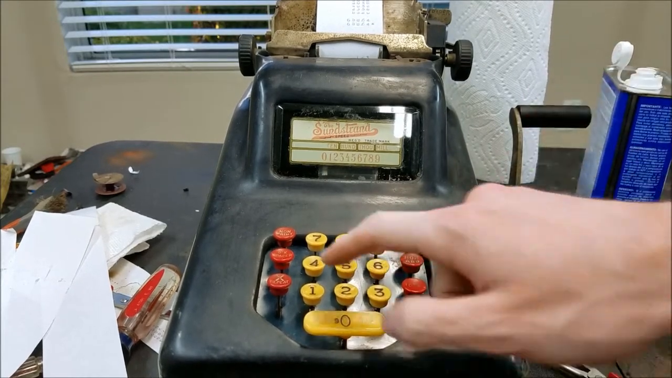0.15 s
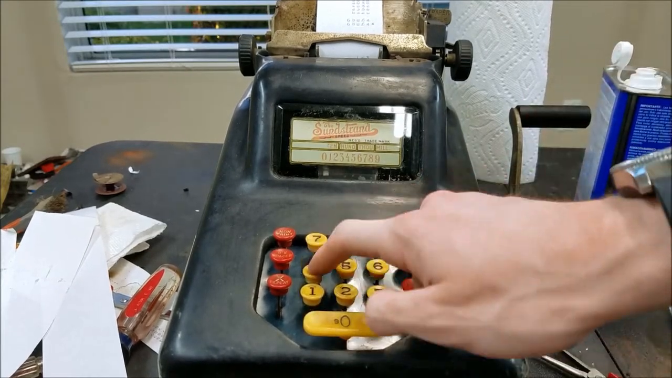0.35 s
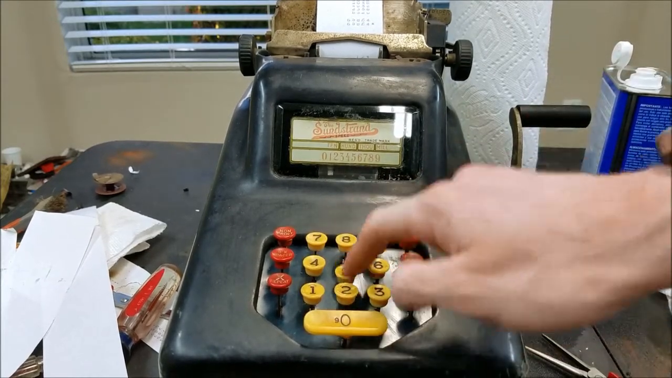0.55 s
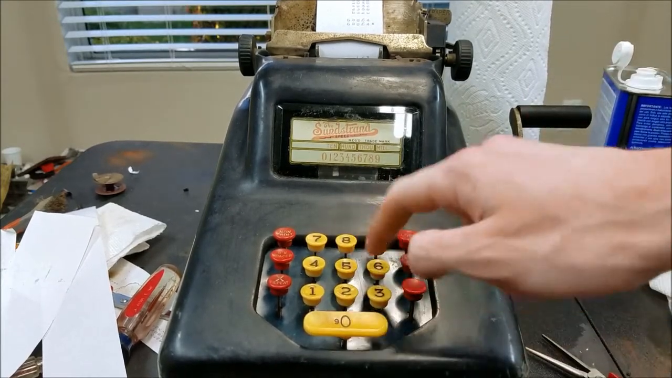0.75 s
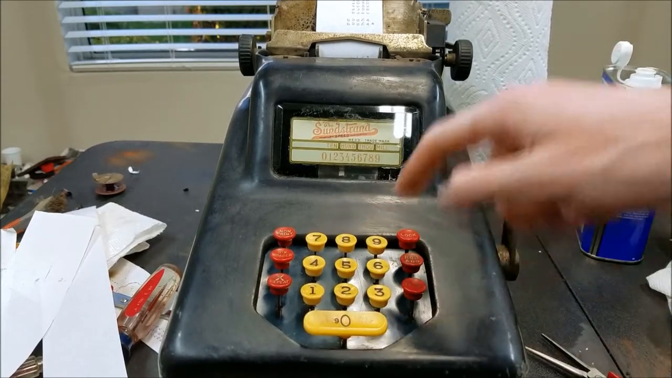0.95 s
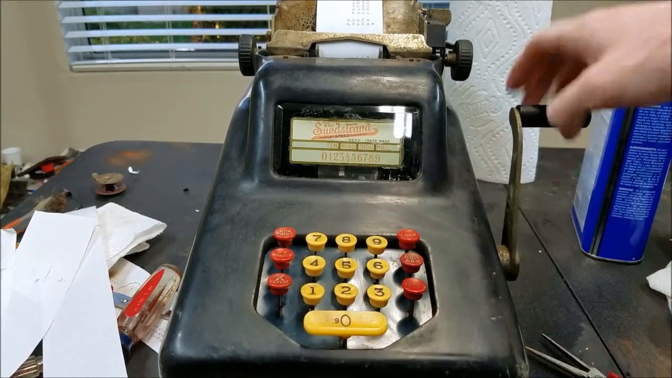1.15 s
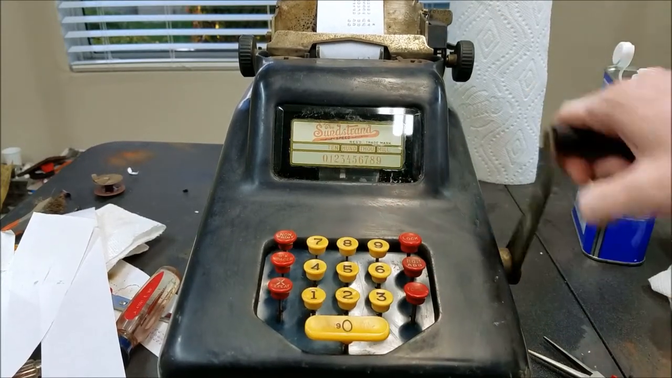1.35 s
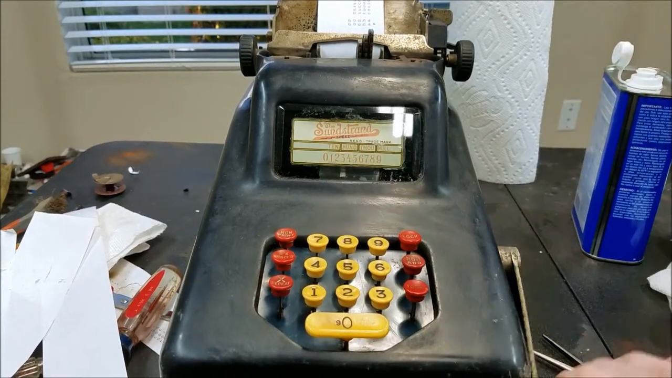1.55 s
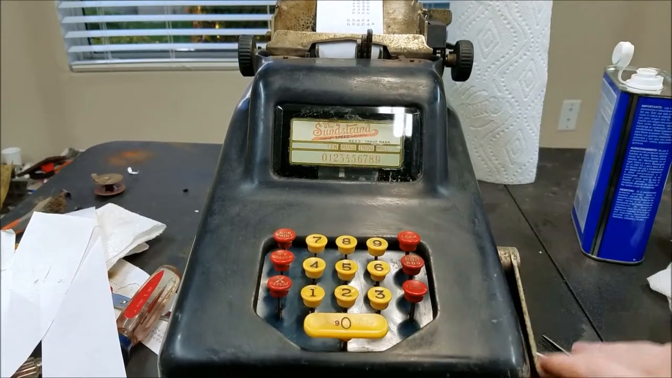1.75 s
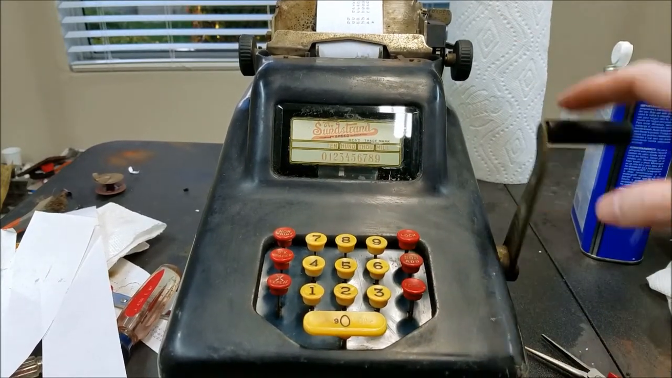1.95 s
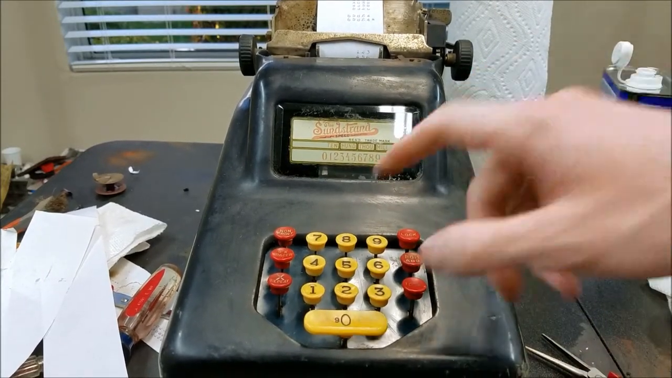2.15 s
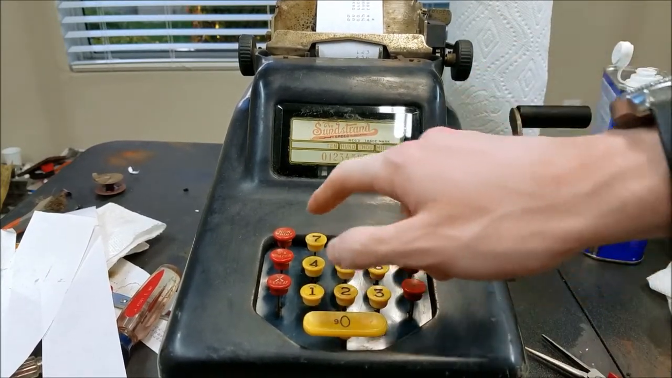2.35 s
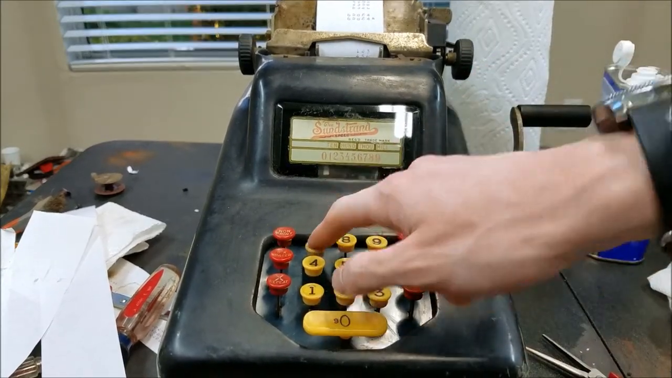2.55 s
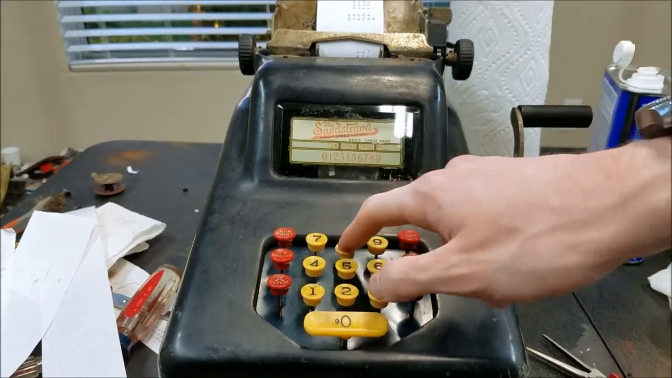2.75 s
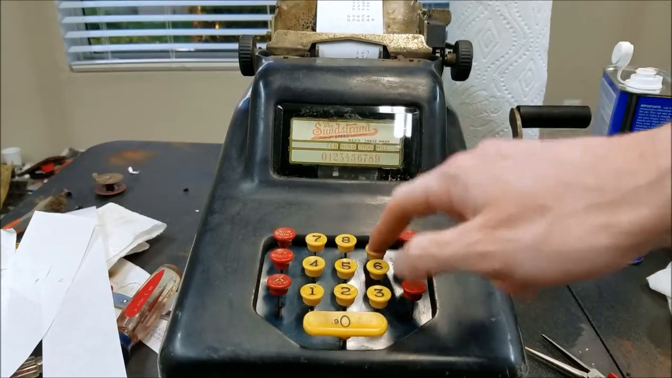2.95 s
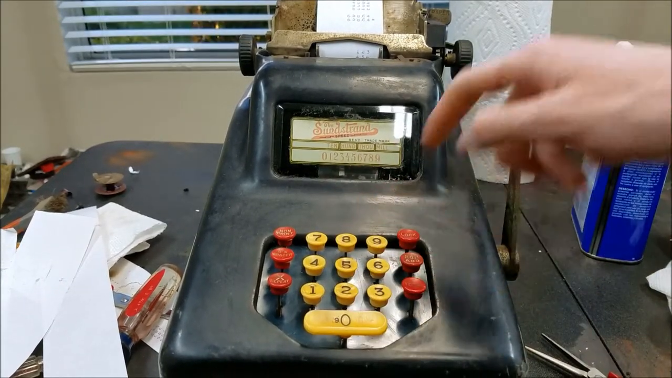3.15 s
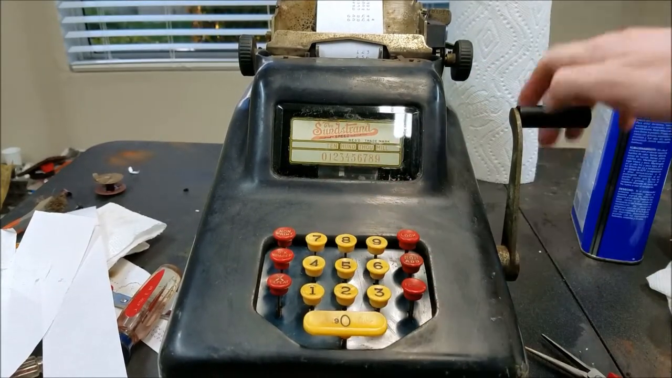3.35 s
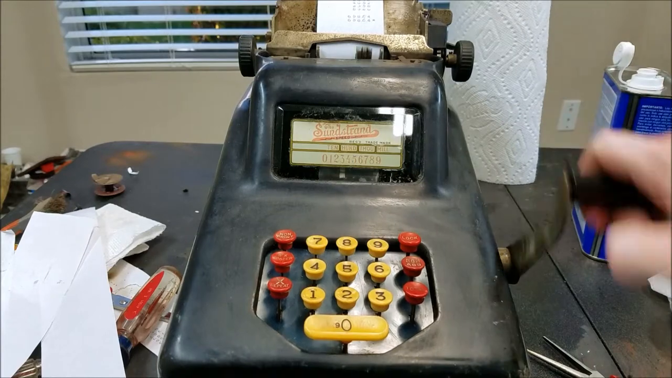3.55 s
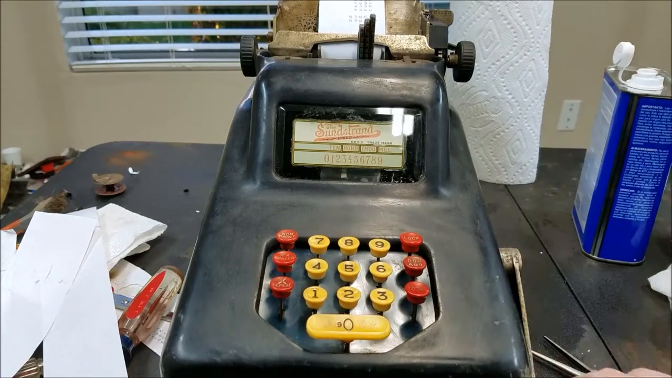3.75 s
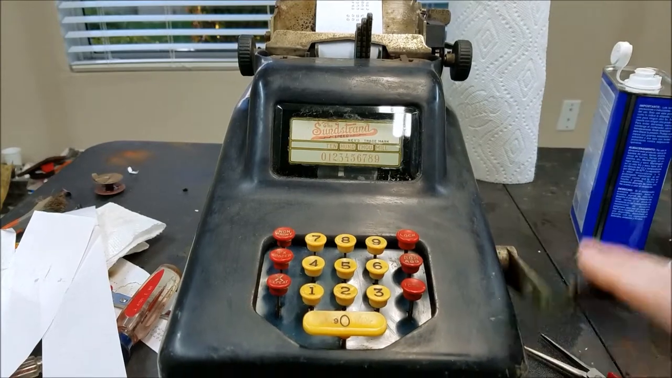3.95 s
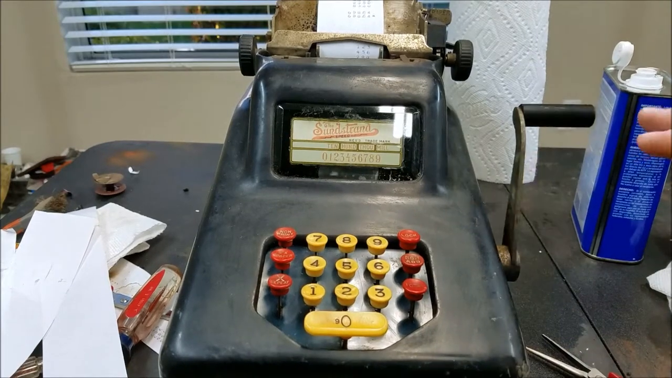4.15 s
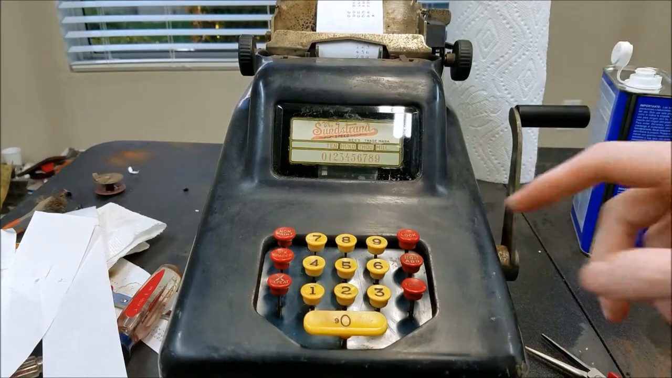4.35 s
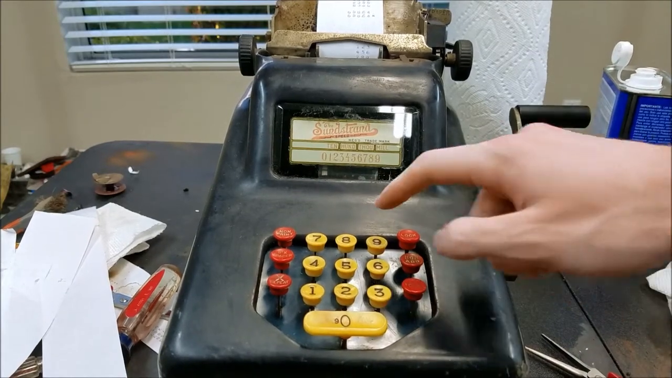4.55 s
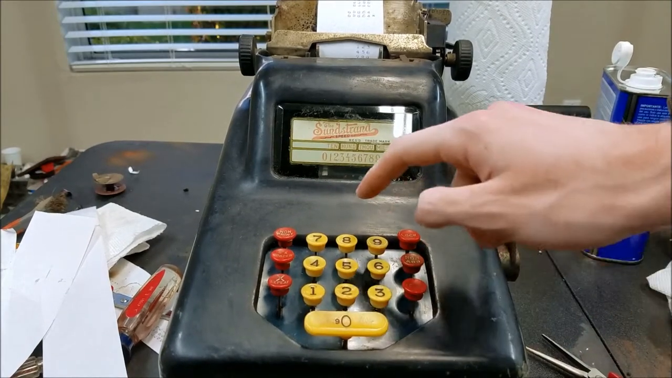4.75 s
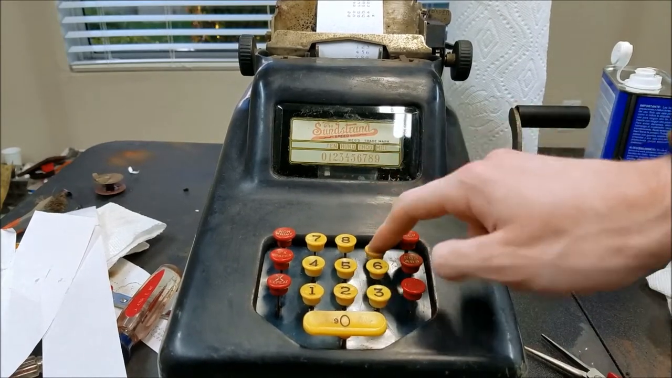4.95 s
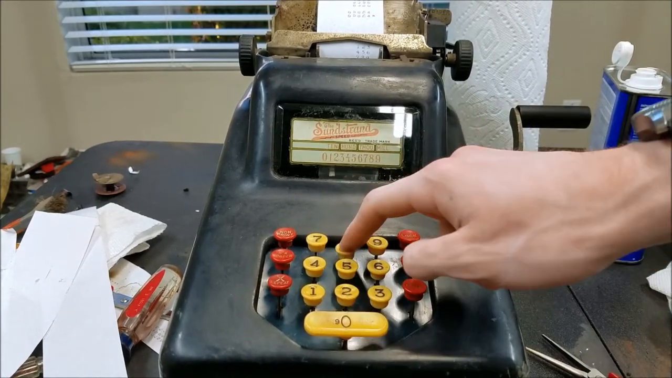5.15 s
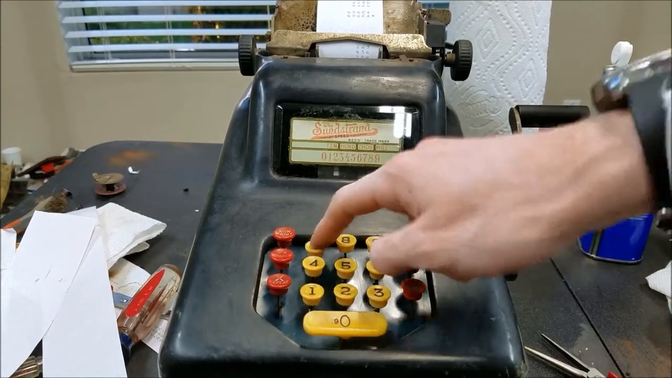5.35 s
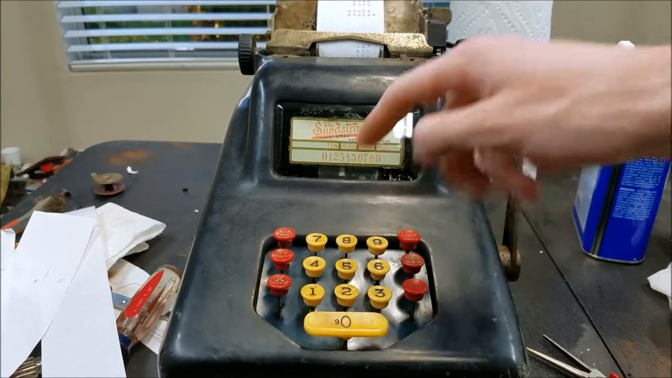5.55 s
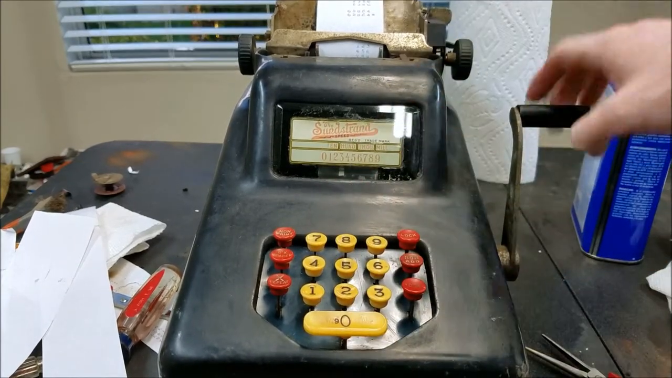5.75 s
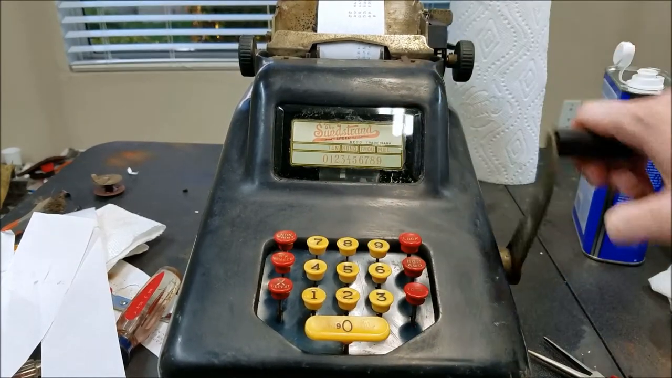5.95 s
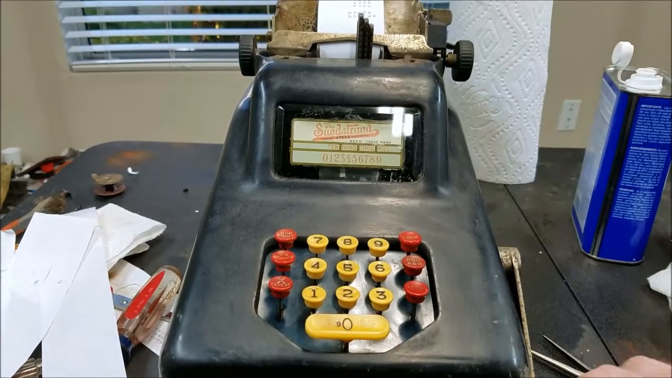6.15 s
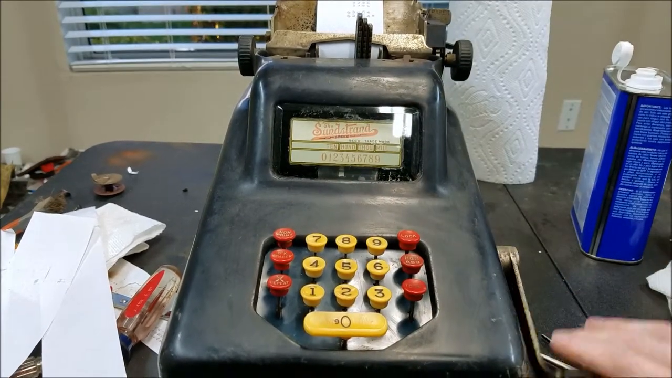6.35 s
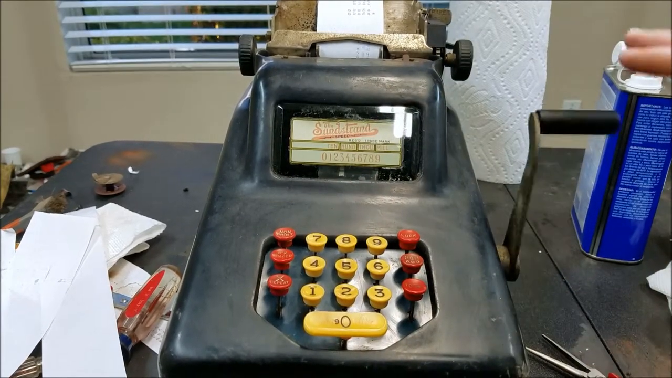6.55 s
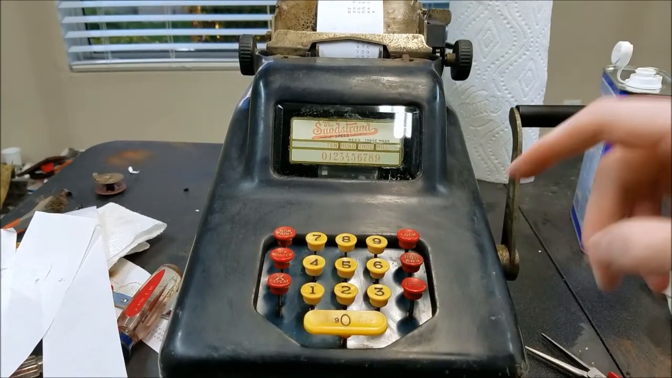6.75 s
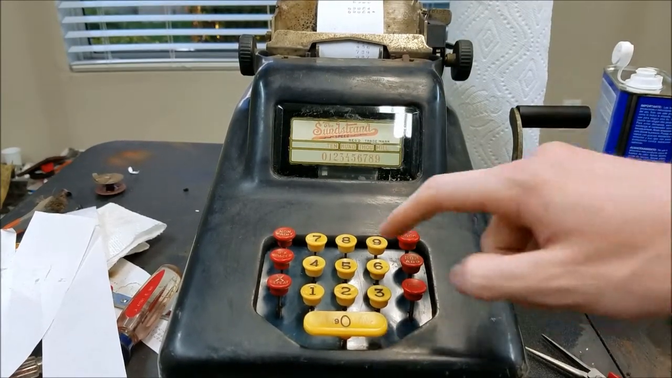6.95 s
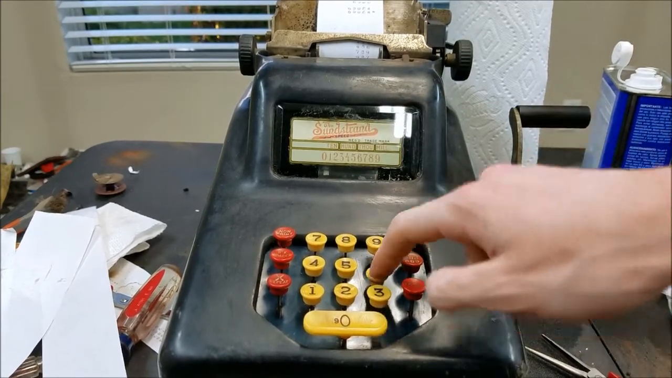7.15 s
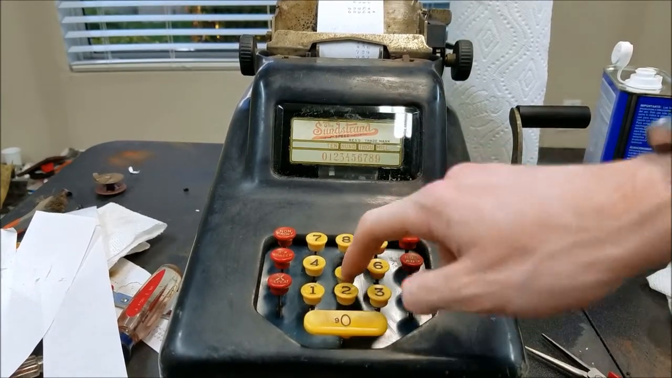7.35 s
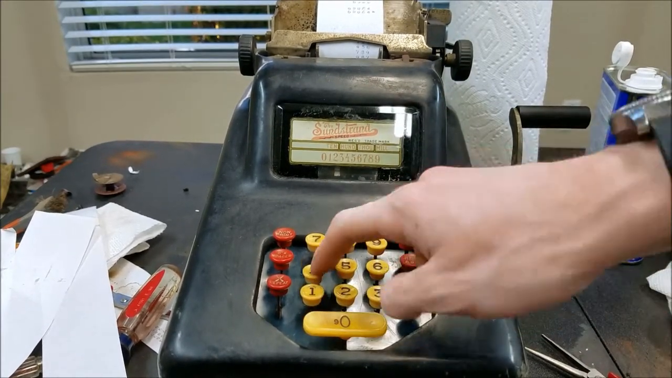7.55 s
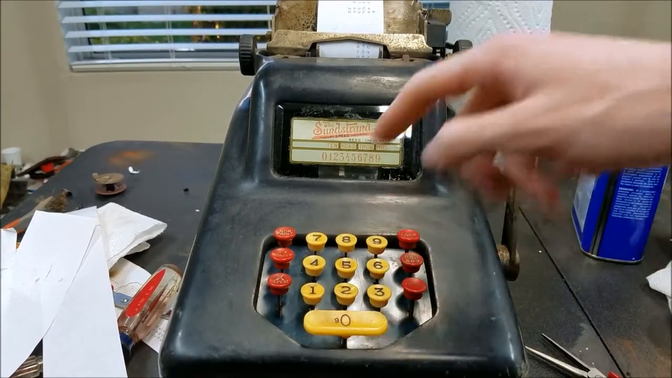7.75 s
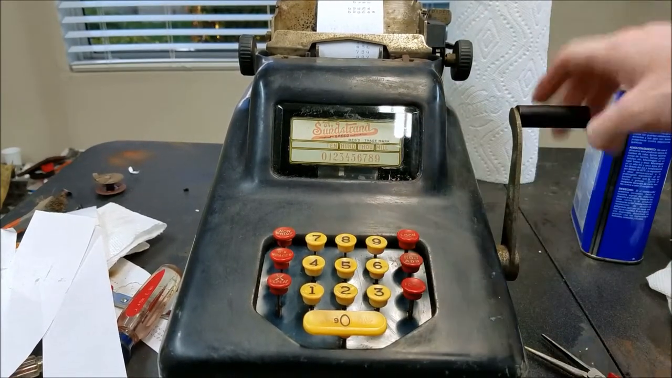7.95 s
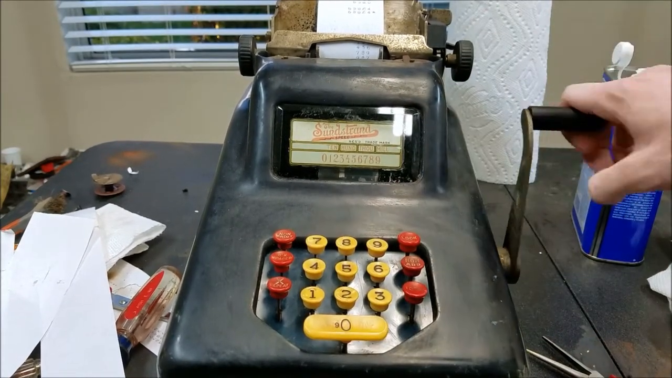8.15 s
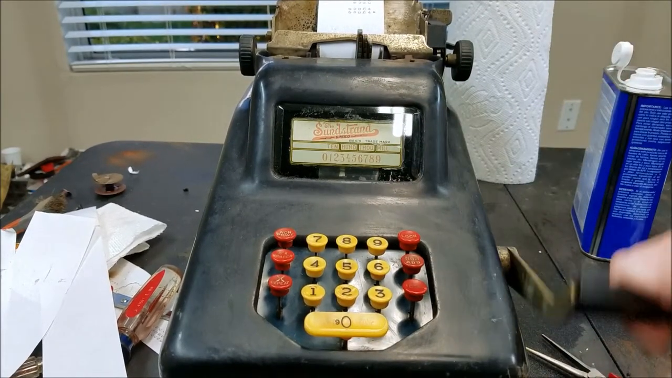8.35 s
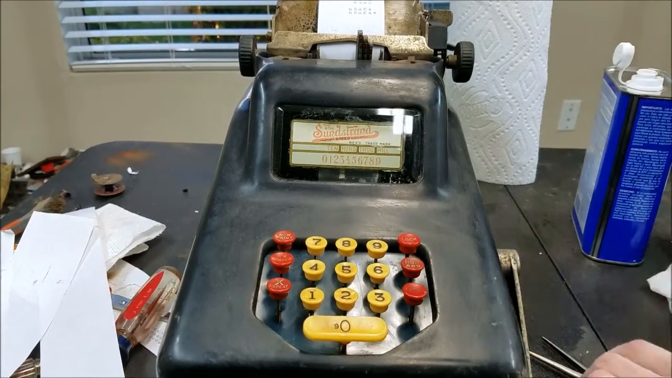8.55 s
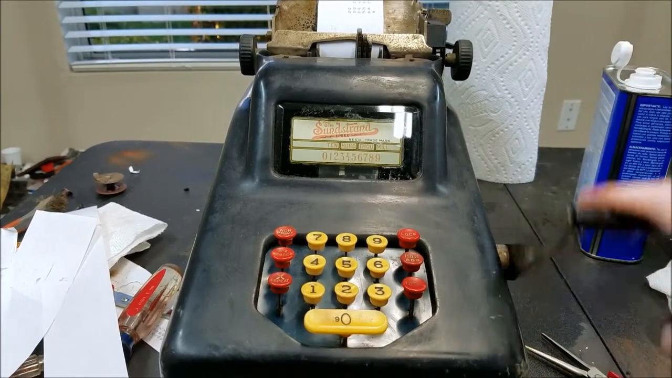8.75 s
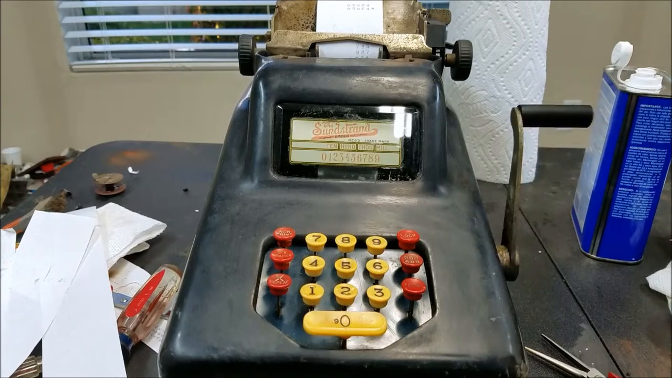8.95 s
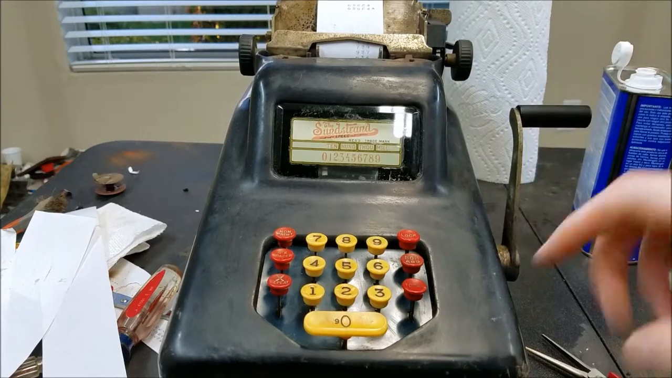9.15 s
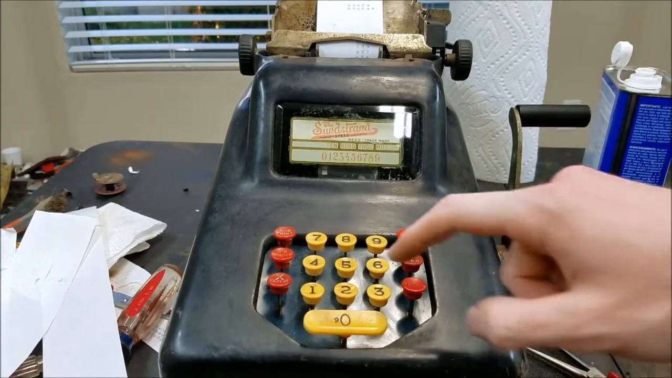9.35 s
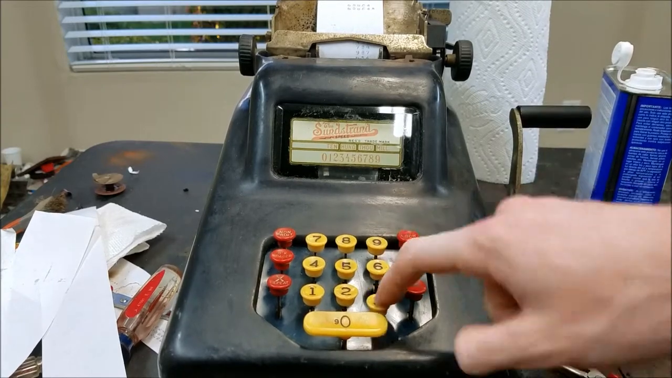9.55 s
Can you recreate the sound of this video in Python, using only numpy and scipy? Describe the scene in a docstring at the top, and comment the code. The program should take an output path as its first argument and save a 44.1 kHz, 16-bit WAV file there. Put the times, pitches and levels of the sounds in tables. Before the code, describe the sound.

Keys of an old mechanical adding machine snap three at a time, each trio followed by a clattering crank pull and a sharp printing whack.

```python
"""A hand-cranked adding machine on a workbench, heard from close by in a hard-walled room.
Four times over, three keys snap down and spring back, then a crank pull steps the racks, fires the
print hammers and lets the works run home; one last key goes down at the end.
Contacts are noise bursts rung through steel, levers and case; loose parts add rattle and jingle.
The bench booms, the room rings on, and a steady hum and hiss lies underneath."""
import sys
import numpy as np
from scipy import signal
from scipy.fft import rfft, irfft, next_fast_len
from scipy.io import wavfile

SR = 44100
rng = np.random.default_rng(int(sys.argv[2]) if len(sys.argv) > 2 else 0)


def file_out(sig):
    """Save sig as 16-bit WAV at sys.argv[1]."""
    # one column per channel
    cols = np.atleast_2d(sig).T
    # limit, then scale
    lim = np.clip(cols, -1, 1)
    pcm = np.round(lim * 32767).astype(np.int16)
    wavfile.write(sys.argv[1], SR, pcm)


N = 423360

# Moments of the model crank cycle that pace every stroke, in seconds: grip, slack, first pawl, racks free,
# racks land, carry, ribbon, bottom stop, hammers, run-back, racks clear, home.
CYCLE_MARKS_S = [-.07, -.02, 0, .05, .08, .145, .185, .305, .545, .63, .697, .805]
# Each stroke at those moments. Each row: time in seconds, force in dB, extra click in dB.
STROKES = [
    [(1.2084, 0, -2), (1.2565, 0, 0), (1.2749, 0, 0), (1.3219, 0.5, -1), (1.3499, 1.5, 1), (1.411, -1, 0),
     (1.4501, -1, -1), (1.5819, -0.5, -1), (1.8197, -1, 2), (1.905, -5, 0), (1.9782, -4, -2),
     (2.093, -1.5, 0)],
    [(3.3861, -1, -0.5), (3.4267, 0, 0), (3.445, 0.5, 0.5), (3.491, -0.5, 0), (3.5155, 0, -2),
     (3.5685, 0, 0), (3.604, 0, -1), (3.7177, 1, 0), (3.952, 0, 1), (4.037, 2.5, 0), (4.1, -5, 3),
     (4.2025, -2, 0)],
    [(5.7834, -5, 6), (5.8372, 0, 0), (5.8588, -1, -1), (5.9091, -2.5, 2), (5.9395, -2, 0.5),
     (6.0062, 0, -0.5), (6.0464, 0.5, -2), (6.1526, 1, -0.5), (6.4041, 0.5, -1), (6.489, 3.5, 0),
     (6.5478, 1, 0), (6.6521, 2, -1)],
    [(8.0443, -14.5, 21), (8.093, 2.5, -6.5), (8.1205, -2.5, 1), (8.1759, -2.5, 1.5), (8.2262, -5.5, 2.5),
     (8.3025, 0, 0), (8.3465, -1, 3), (8.4688, -1, 0), (8.7139, 0, 0.5), (8.799, -4, 2), (8.8655, 3, 0),
     (8.973, 1, 1.5)],
]
# Pawls, racks, hammers and stops of the model cycle, before force.
# Each row: cycle time in seconds, click in dB, clack in dB, knock in dB.
CYCLE_CONTACTS = [(-.07, -66, -52.5, -40), (-.02, -61, -46.5, -33.5), (0, -44, -40.5, -28),
                  (.023, -54, -44.5, -35), (.05, -26.5, -30, -22.5), (.08, -32, -28.5, -15),
                  (.124, -43, -34.5, -27.5), (.145, -24.5, -26, -34), (.175, -38, -28, -28.5),
                  (.185, -30, -21, -30), (.208, -32, -32, -38), (.228, -27, -36.5, -34),
                  (.259, -34.5, -26, -34), (.286, -32.5, -26, -34), (.305, -17.5, -17, -23.5),
                  (.319, -37, -29, -23), (.507, -51, -39.5, -48), (.515, -37.5, -29.5, -28.5),
                  (.537, -27.5, -26.5, -24), (.545, -8.5, -24.5, -25), (.556, -19, -20, -21),
                  (.587, -21, -20, -28), (.612, -19.5, -21, -29.5), (.653, -25, -21.5, -27.5),
                  (.697, -31, -22, -24.5), (.755, -27.5, -26.5, -26), (.787, -31, -33.5, -26.5),
                  (.805, -27.5, -27.5, -22), (.832, -41, -36.5, -29.5)]
# Contacts that only one stroke makes. Each row: time in seconds, click in dB, clack in dB, knock in dB.
STRAY_CONTACTS = [(5.7261, -54.5, -54, -62), (6.4835, -19.5, -15.5, -21.5), (7.9068, -55, -51.5, -62),
                  (8.0192, -57.5, -70, -49), (8.2009, -39, -56.5, -27.5), (8.9018, -19.5, -18, -24.5)]
# A key going down. Each row: slack taken up in seconds, its click in dB, its knock in dB,
# stem bottoming in seconds, its click in dB, its knock in dB.
PRESSES = [(0.3318, -50, -35, .3481, -17.5, -27), (.565, -37, -26, .5799, -24, -26.5),
           (0.7946, -33.5, -31, .8051, -19, -22), (2.4608, -44, -39, 2.4734, -16.5, -27),
           (2.7184, -40.5, -29.5, 2.7323, -16.5, -26.5), (2.9593, -51.5, -30.5, 2.9792, -16.5, -26.5),
           (4.9053, -38.5, -27.5, 4.9188, -14, -26), (5.1376, -26.5, -26.5, 5.1466, -13, -25.5),
           (5.3546, -24.5, -22.5, 5.3625, -12.5, -27.5), (7.0772, -43.5, -30.5, 7.0907, -17, -28.5),
           (7.3055, -32, -29, 7.3163, -14, -25), (7.5337, -20.5, -29.5, 7.542, -12, -23.5),
           (9.4855, -35, -27, 9.4977, -14, -32)]
# A key springing back. Each row: time in seconds, click in dB, knock in dB.
RELEASES = [(.464, -23, -22.5), (.6972, -24.5, -23.5), (0.9196, -17.5, -22.5), (2.5994, -26.5, -25),
            (2.8414, -26, -26), (3.0856, -18.5, -25), (5.0291, -22, -27.5), (5.2523, -20.5, -27),
            (5.4825, -20.5, -23), (7.1996, -21.5, -25), (7.4226, -20.5, -23), (7.6675, -20, -22)]
# A catch ticking before a key lets go. Each row: time in seconds, click in dB.
CATCHES = [(.8832, -30.5), (3.0493, -27.5)]
# The print hammers fire. Each row: time in seconds, shiver of the type bars in dB.
HAMMERS = [(1.823, -27.5), (3.956, -26), (6.408, -27), (8.718, -23)]
# The works running, before force. Each row: cycle time in seconds, rattle in dB, jingle in dB.
RUNNING = [(-.02, -59, -64), (.05, -41.5, -65), (.11, -45, -60.5), (.18, -38, -48), (.23, -34.5, -52),
           (.36, -47.5, -58), (.57, -32, -46), (.75, -31.5, -46), (1.05, -51.5, -63)]
# Works and bench coming to rest from an earlier stroke.
# Each row: time in seconds, rattle in dB, jingle in dB, boom in dB.
SETTLING = [(0, -35, -48, -62), (.13, -50, -65, -52), (.3, -60, -74.5, -54)]

# Pawls, racks and type bars. Each row: centre in Hz, width in Hz, relative level in dB.
STEEL_MODES = [(4780, 2440, -2.5), (7730, 1430, 1), (10200, 1520, -3.5), (11760, 1210, -0.5),
               (14250, 3800, -5.5)]
# Key stems and their catches. Each row: centre in Hz, width in Hz, relative level in dB.
STEM_MODES = [(5710, 1780, 0), (8520, 1300, 0.5), (11740, 2260, -1.5), (15400, 1640, -5)]
# Levers and key stems. Each row: centre in Hz, width in Hz, relative level in dB.
LEVER_MODES = [(1496, 187, 1), (2120, 376, 0), (2760, 385, 0.5), (3600, 1870, -7)]
# Case and cover. Each row: centre in Hz, width in Hz, relative level in dB.
CASE_MODES = [(211.4, 32, -9), (311.4, 52, -5), (396.2, 26.4, 2.5), (471.7, 24.6, -1), (577.5, 36, -1.5),
              (698.5, 44, -2.5), (833, 27.8, -1.5), (901.4, 24.5, -1), (985, 86, -9), (1090, 38, -5),
              (1309, 83, -4.5)]
# Heavily damped frame, heard only when struck. Each row: centre in Hz, width in Hz, relative level in dB.
FRAME_MODES = [(640, 260, -5), (981, 298, 0), (1375, 384, -4), (2350, 630, -11.5)]
# Three lowest bench modes. Each row: centre in Hz, width in Hz, dB (no effect: each is rung alone).
BENCH_MODES = [(93, 30, 0), (126.3, 9.9, 0), (154.5, 12, 8)]
# How knocks shake each bench mode. Each row: level at rest in dB, keys in dB, crank in dB, t60 in seconds.
BENCH_SHAKING = [(-75.5, -36.5, -41, .6), (-67.5, -22.5, -29, .5), (-66, -26, -30, 0.66)]
# Lowest bench mode, a hum that comes and goes. Each row: time in seconds, level in dB.
LOW_HUM = [(0, -64.5), (1.0, -60), (1.25, -71), (2.25, -70), (2.5, -59), (3.45, -59), (3.7, -73),
           (8.95, -74), (9.15, -60.5), (9.6, -60)]
# Top bench mode loaded by the hand on the crank, before force. Each row: cycle time in seconds, boom in dB.
HAND_STRAIN = [(0, -61), (.09, -42.5), (.3, -44), (.45, -55), (.56, -45), (.85, -56), (1.1, -67.5)]

# Decay of the room. Each row: frequency in Hz, t60 in seconds.
ROOM_T60 = [(150, 0.94), (500, 0.79), (2000, 0.62), (6000, 0.7), (10000, 0.42), (14000, 0.33)]
# Spectrum of room hum and hiss. Each row: frequency in Hz, relative level in dB per Hz.
AIR_SPECTRUM = [(15, -53), (25, -26), (43, -27.5), (134, -9), (256, -11), (293, -2), (344, -18), (373, -15),
                (1480, -16.5), (7310, -41), (16000, -31)]
# Likeness of left and right. Each row: frequency in Hz, correlation from 0 to 1.
PORT_LIKENESS = [(60, 0.85), (150, 1), (400, 0.79), (1500, 0.21), (5000, 0.21), (14000, 0.35)]
# Balance of the two ports. Each row: frequency in Hz, left minus right in dB.
PORT_LEAN = [(100, -1), (350, -4), (700, -0.7), (2000, -2), (5000, -4.5), (9000, -1), (14000, 1.5)]

TOP_HZ = 15800
# Clack at a reference click, and its growth in dB per dB of click
REFERENCE_CLICK_DB, CLACK_DB_PER_CLICK_DB = -19.5, .3
SLACK_CLACK_DB, PRESS_CLACK_DB, RELEASE_CLACK_DB = -30, -24.5, -23.5
CATCH_DULL_DB = -13  # clack and knock relative to the catch's click
REBOUND_S, REBOUND_DB = .018, (-17, -6.5, -6.5)  # click, clack, knock relative to the first stop


def crank():
    """Heavy steps of the works: bursts ring the steel parts, the levers and the case."""
    rows = crank_contacts()
    click = blows(rows, axis=1, snap_s=0.0097, chatter_s=0.16, chatter_db=-14.5, lead_db=-14.5)
    clack = blows(rows, axis=2, snap_s=0.019, chatter_s=0.14, chatter_db=-8, lead_db=-4.0)
    knock = blows(rows, axis=3, snap_s=0.016, chatter_s=0.17, chatter_db=-10.5, lead_db=-17.5)
    return (amp(2) * ring(click, STEEL_MODES)
            + amp(-2.5) * ring(clack, LEVER_MODES)
            + amp(-1.65) * ring(knock, CASE_MODES))


def crank_contacts():
    """Rows (s, click, clack, knock dB) of all strokes, with the strays."""
    strokes = [paced(CYCLE_CONTACTS, stroke) for stroke in STROKES]
    for rows, stroke in zip(strokes, np.array(STROKES)):
        rows[:, 1] += np.interp(rows[:, 0], stroke[:, 0], stroke[:, 2])
    return np.vstack(strokes + [STRAY_CONTACTS])


def paced(rows, stroke):
    """Model-cycle rows at the pace and force of one stroke; after home, time runs on evenly."""
    rows = np.array(rows)
    mark_s, force_db, _ = np.transpose(stroke)
    after_home_s = np.maximum(rows[:, 0] - CYCLE_MARKS_S[-1], 0)
    when_s = np.interp(rows[:, 0], CYCLE_MARKS_S, mark_s) + after_home_s
    levels_db = rows[:, 1:] + np.interp(rows[:, :1], CYCLE_MARKS_S, force_db)
    return np.column_stack([when_s, levels_db])


def keys():
    """Light, bright snaps under the finger: bursts ring the stems, the levers and the case."""
    rows = key_contacts()
    click = blows(rows, axis=1, snap_s=0.0076, chatter_s=0.087, chatter_db=-27.0, lead_db=-5)
    clack = blows(rows, axis=2, snap_s=0.022, chatter_s=0.1, chatter_db=-11.0, lead_db=-20)
    knock = blows(rows, axis=3, snap_s=0.042, chatter_s=0.18, chatter_db=-9.5, lead_db=-41.0)
    return (amp(3) * ring(click, STEM_MODES)
            + amp(2.5) * ring(clack, LEVER_MODES)
            + amp(-2.5) * ring(knock, CASE_MODES))


def key_contacts():
    """Rows (s, click, clack, knock dB): slack, bottoming, spring-back, one rebound each, catches."""
    def clack(base_db, click_db):
        return base_db + CLACK_DB_PER_CLICK_DB * (click_db - REFERENCE_CLICK_DB)

    slack = [(s, click, clack(SLACK_CLACK_DB, click), knock) for s, click, knock, *_ in PRESSES]
    down = [(s, click, clack(PRESS_CLACK_DB, click), knock) for *_, s, click, knock in PRESSES]
    up = [(s, click, clack(RELEASE_CLACK_DB, click), knock) for s, click, knock in RELEASES]
    rebound = list(np.array(up) + [REBOUND_S, *REBOUND_DB])
    catches = [(s, db, db + CATCH_DULL_DB, db + CATCH_DULL_DB) for s, db in CATCHES]
    return slack + down + up + rebound + catches


def hammers():
    """Struck type bars shiver: dense decaying impacts ring steel and levers."""
    envelope = np.sqrt(dying(HAMMERS, axis=1, t60_s=0.56)[1])
    shiver = shaken(envelope * spikes(rate_hz=1500, spread_db=1.8))
    return ring(shiver, STEEL_MODES) + amp(-6) * ring(shiver, LEVER_MODES)


def running():
    """Racks and gears rattle in the case and springs jingle, as streams of uneven impacts."""
    spans = [SETTLING] + [paced(RUNNING, stroke) for stroke in STROKES]
    rattle_gain = sum(gain(span, axis=1) for span in spans)
    jingle_gain = sum(gain(span, axis=2) for span in spans)
    rattle = shaken(rattle_gain * spikes(rate_hz=500, spread_db=4.5))
    jingle = shaken(jingle_gain * spikes(rate_hz=900, spread_db=4.9))
    return (amp(-9.5) * ring(rattle, CASE_MODES)
            + amp(-17.0) * ring(rattle, LEVER_MODES)
            + amp(-12) * ring(jingle, STEEL_MODES))


def frame_thuds(rows, t60_s):
    """The damped frame takes each knock as one short dry blow."""
    return ring(shaken(np.sqrt(dying(rows, axis=3, t60_s=t60_s)[1])), FRAME_MODES)


def bench():
    """Each low mode booms on its own, stirred by the knocks and by a slower load."""
    strain = sum(gain(paced(HAND_STRAIN, stroke), axis=1) for stroke in STROKES)
    loads = [gain(LOW_HUM, axis=1), gain(SETTLING, axis=3), strain]
    boom = 0
    for mode, load, (rest_db, keys_db, crank_db, t60_s) in zip(BENCH_MODES, loads, BENCH_SHAKING):
        power = amp(2 * rest_db) + load ** 2
        power = power + amp(2 * keys_db) * dying(key_contacts(), axis=3, t60_s=t60_s)[1]
        power = power + amp(2 * crank_db) * dying(crank_contacts(), axis=3, t60_s=t60_s)[1]
        noise = np.sqrt(power) * rng.standard_normal((2, N))
        boom = boom + ring(pair(noise), [mode])
    return boom


def room(x):
    """Diffuse tail, each frequency dying at its own speed; parts at other spots excite other echoes."""
    step = SR // 4  # a fresh tail every quarter second
    delay = 200  # samples
    wet = np.zeros((2, N + 2 * SR))
    for start in range(0, N, step):
        hz, t, z = signal.stft(rng.standard_normal((2, 2 * SR // 3)), SR, nperseg=256)
        decay = amp(-60 * t / along(ROOM_T60, hz)[:, None])
        tail = signal.istft(z * decay, SR, nperseg=256)[1][:, :SR]
        tail = tail / np.linalg.norm(tail[0])
        echo = signal.fftconvolve(x[None, start:start + step], tail, axes=1)
        wet[:, start + delay:][:, :echo.shape[1]] += echo
    return pair(wet[:, :N])


def air():
    """Steady hum and hiss of the room: shaped noise."""
    noise = pair(rng.standard_normal((2, N)))
    return amp(-60.0) * unit(filtered(noise, lambda hz: amp(along(AIR_SPECTRUM, hz))))


def blows(rows, axis, snap_s, chatter_s, chatter_db, lead_db):
    """Each contact: a dying burst, then loose chatter; the hardest ones touch a moment early."""
    power, burst = dying(rows, axis, snap_s)
    hard = [row for row in rows if row[1] > -21]  # by click dB
    early = np.roll(dying(hard, axis, snap_s)[1], -round(0.0027 * SR))
    sound = shaken(np.sqrt(burst + amp(2 * lead_db) * early))
    # into the room, the short burst is a single push of the same energy
    sound[2] = np.sqrt(power * snap_s * SR / (2 * np.log(1000)))
    chatter = np.sqrt(dying(rows, axis, chatter_s)[1]) * spikes(rate_hz=700, spread_db=2.3)
    return sound + amp(chatter_db) * shaken(chatter)


def dying(rows, axis, t60_s):
    """Power at each row's time, and its course: a short rise, then a decay of 60 dB in t60_s."""
    rows, power = np.array(rows), np.zeros(N)
    np.add.at(power, np.round(rows[:, 0] * SR).astype(int), amp(2 * rows[:, axis]))
    fall = amp(-60 / (t60_s * SR)) ** 2
    rise = fall * np.exp(-1 / (0.028 * t60_s * SR))
    course = signal.lfilter([1], [1, -fall], power) - signal.lfilter([1], [1, -rise], power)
    return power, abs(course)


def shaken(shape):
    """Random-sign noise under an envelope: left, right, and what goes out into the room."""
    noise = shape * rng.choice([-1, 1], (3, N))
    return np.vstack([pair(noise[:2]), noise[2:]])


def spikes(rate_hz, spread_db):
    """Dense uneven impacts of loose parts at random times, rms 1."""
    size = amp(spread_db * rng.standard_normal(N))
    hits = size * (rng.random(N) < rate_hz / SR)
    return unit(signal.lfilter([1], [1, -.93], hits))


def ring(x, modes):
    """x through resonances of alternating sign, scaled so that white noise keeps its rms."""
    def response(f):
        h = 0
        for k, (centre, width, db) in enumerate(modes):
            damping = 1j * f * width
            h = h + (-1) ** k * amp(db) * damping / (centre * centre - f * f + damping)
        return h / np.sqrt(np.mean(abs(h) ** 2))
    return filtered(x, response)


def pair(both):
    """Two unrelated signals turned into left and right, partly shared by the microphone ports."""
    def mid_side(hz):
        turn = np.arccos(np.clip(along(PORT_LIKENESS, hz), -1, 1)) / 2
        return np.array([np.cos(turn), np.sin(turn)])
    mid, side = filtered(both, mid_side)
    return np.array([mid + side, mid - side])


def filtered(x, response):
    """x times a complex response of frequency, zero-padded against wrap-around."""
    m = next_fast_len(N + SR // 5, True)
    return irfft(rfft(x, m) * response(np.fft.rfftfreq(m, 1 / SR)), m)[..., :N]


def gain(rows, axis):
    """Gain per sample from one dB column; at -150 dB outside the table."""
    rows = np.array(rows)
    return amp(np.interp(np.arange(N) / SR, rows[:, 0], rows[:, axis], -150, -150))


def along(points, hz):
    """(Hz, value) points interpolated on a log axis."""
    f, v = np.transpose(points)
    return np.interp(np.log(hz + 1), np.log(f + 1), v)


def unit(x):
    """Scaled to rms 1."""
    return x / np.sqrt(np.mean(x ** 2) + 1e-20)


def amp(db):
    """dB to gain."""
    return 10 ** (np.asarray(db) / 20)


def scene():
    """The machine, its room, the bench and the air."""
    machine = crank() + keys() + hammers() + running()
    machine = machine + amp(3.5) * frame_thuds(crank_contacts(), t60_s=0.032)
    machine = machine + amp(0.2) * frame_thuds(key_contacts(), t60_s=0.023)
    return machine[:2] + amp(-5.5) * room(machine[2]) + bench() + air()


def record(dry):
    """The two microphone ports are shaded unequally; nothing is kept from TOP_HZ up."""
    def ports(hz):
        return amp(np.outer([.5, -.5], along(PORT_LEAN, hz))) * (hz < TOP_HZ)
    return filtered(dry, ports)


dry = scene()
out = record(dry)
file_out(out)
```